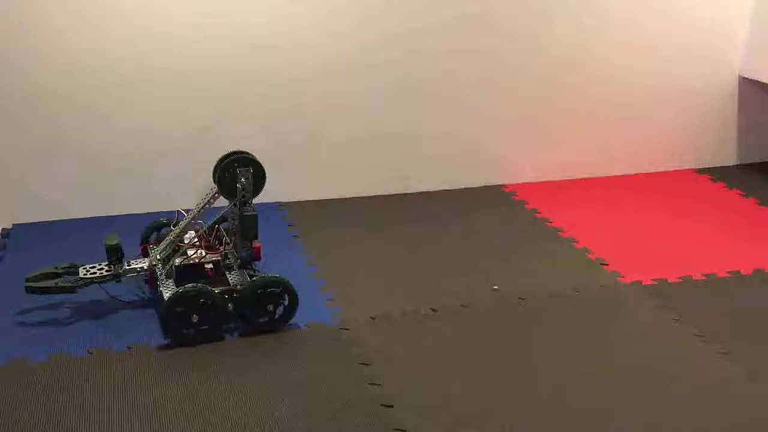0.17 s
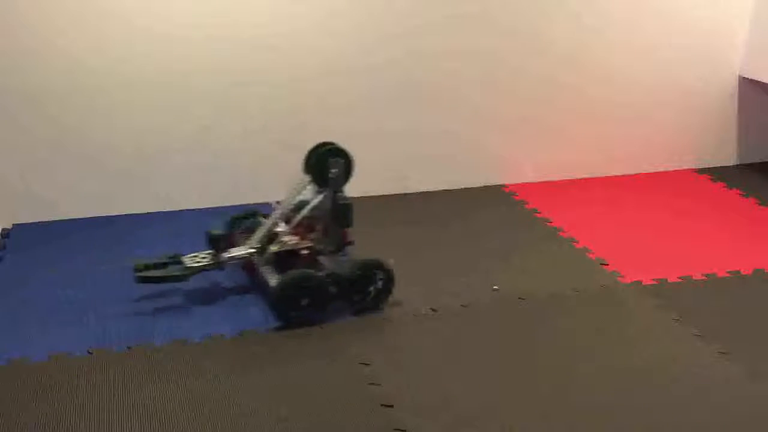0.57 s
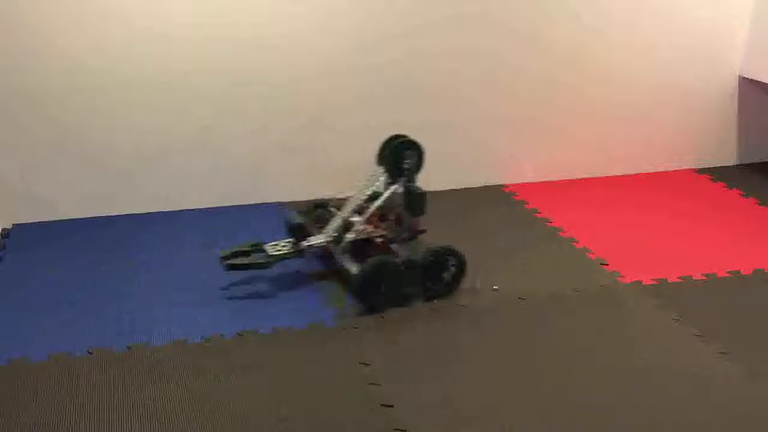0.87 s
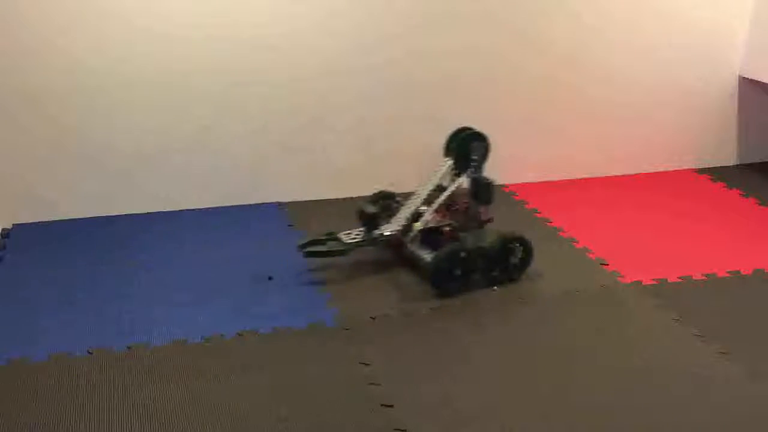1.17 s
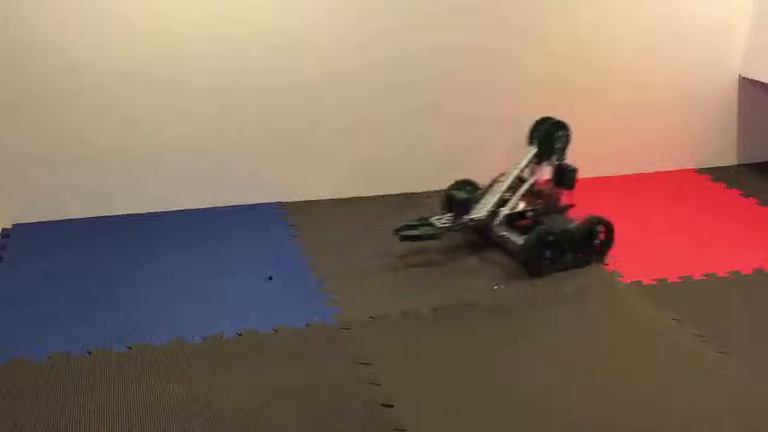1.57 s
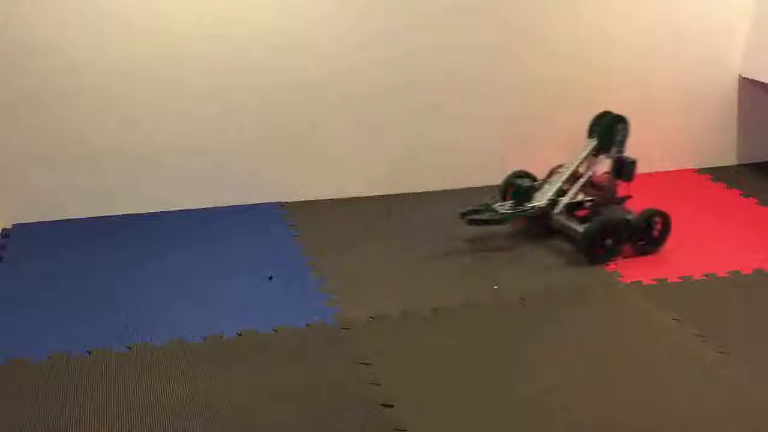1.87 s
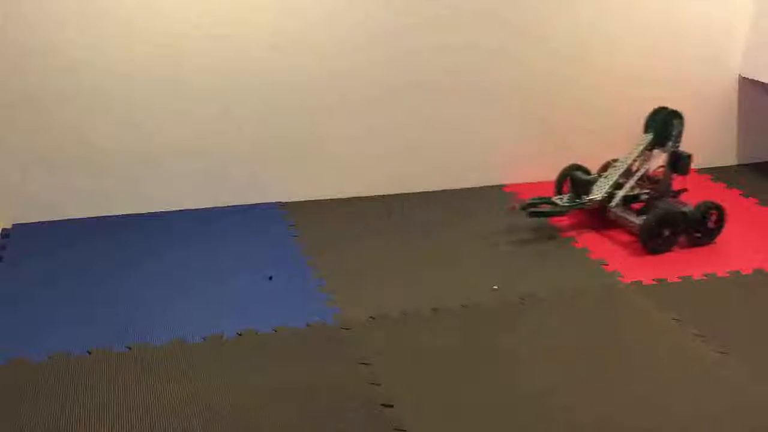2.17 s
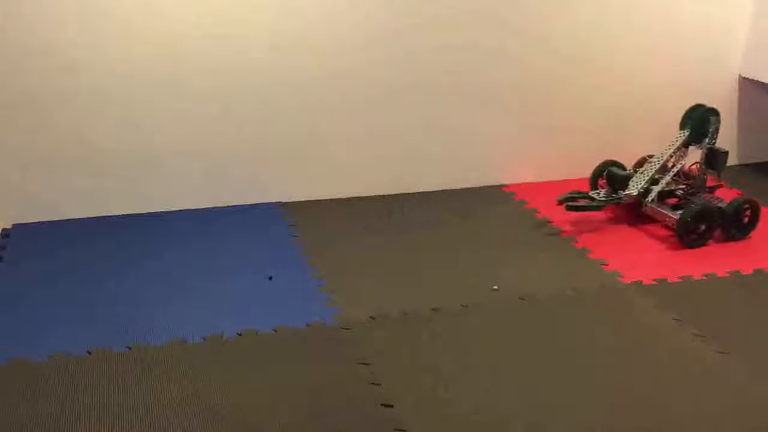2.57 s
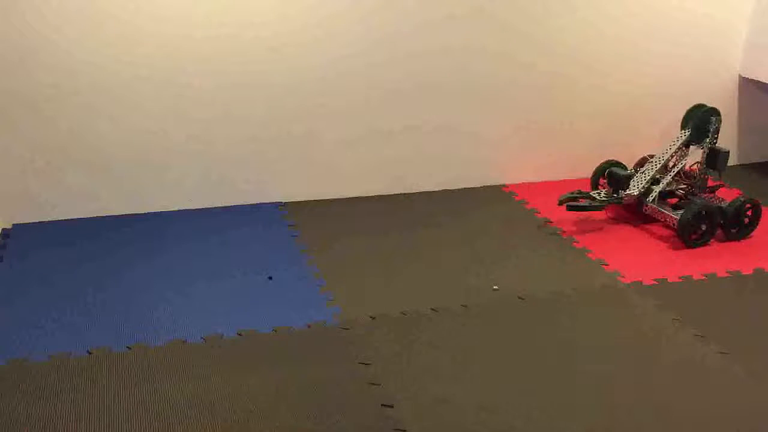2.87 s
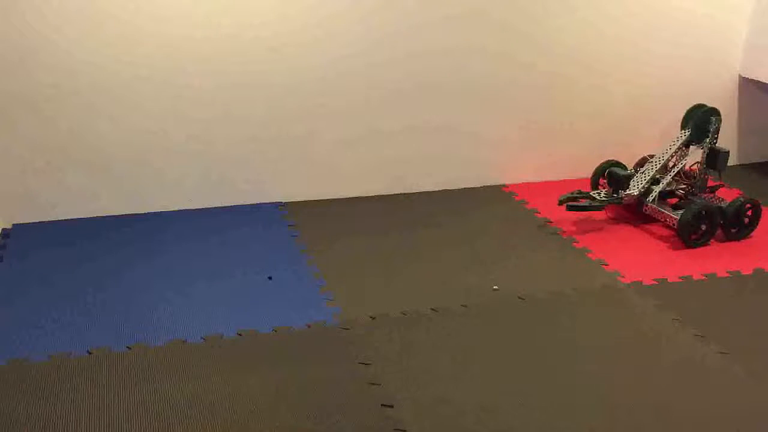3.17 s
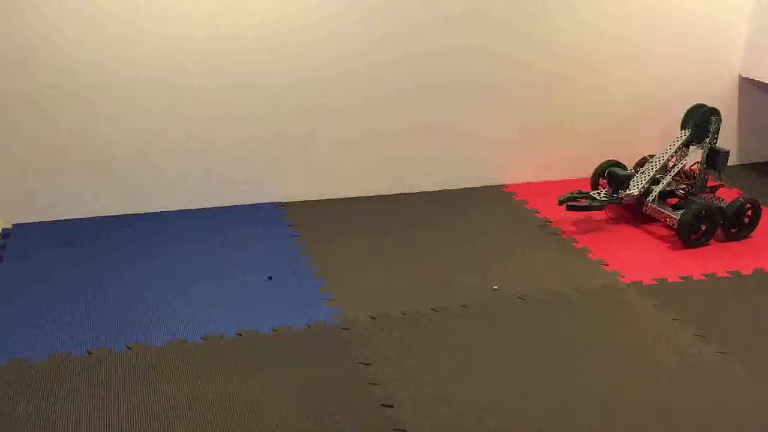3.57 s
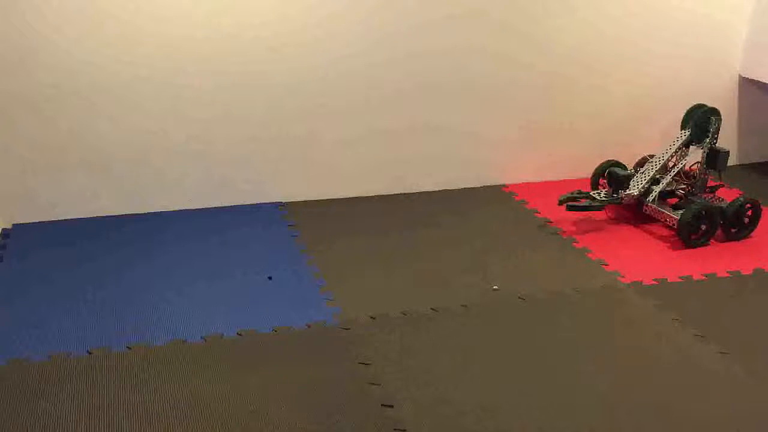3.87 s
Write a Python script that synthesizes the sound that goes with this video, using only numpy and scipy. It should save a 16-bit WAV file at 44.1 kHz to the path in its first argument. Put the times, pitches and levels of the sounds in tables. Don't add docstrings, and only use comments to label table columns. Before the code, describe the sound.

In a quiet room, a faint distant machine whine falls and fades just as a small robot starts with a rough motor groan. Gritty plastic gear rattle and wavering high whines run steadily over dull wheel rumble on foam, with small knocks and one sharp crack. It slows, grows duller and stops, leaving soft hiss. One microphone a few metres away.

```python
import sys
import numpy as np
from scipy import signal
from scipy.fft import rfft, irfft, next_fast_len
from scipy.io import wavfile
from scipy.ndimage import uniform_filter1d

SR = 44100
rng = np.random.default_rng(int(sys.argv[2]) if len(sys.argv) > 2 else 0)


def store_wav(level_fs):
    pcm = np.round(np.clip(np.atleast_2d(level_fs), -1, 1) * 32767)
    wavfile.write(sys.argv[1], SR, pcm.T.astype(np.int16))


def magnitude_from_level(level_db):
    exponent = np.asarray(level_db, float) / 20
    return 10 ** exponent


N = 177061
TIME = np.arange(N) / SR
START_S = .26


def noise():
    return rng.standard_normal(N)


def level(x, db):
    return x * magnitude_from_level(db) / np.sqrt(np.mean(x ** 2))


def curves(table, quiet_db=-130):
    s, *columns = np.transpose(table)
    gate_times = [s[0] - .004, s[0], s[-1], s[-1] + .03]
    gate_db = np.interp(TIME, gate_times, [quiet_db, 0, 0, quiet_db])
    return [np.interp(TIME, s, c) for c in columns] + [magnitude_from_level(gate_db)]


def colour(x, points):
    hz, db = np.transpose(points)
    size = next_fast_len(N)
    f = np.arange(size // 2 + 1) * SR / size + 1
    gain = magnitude_from_level(np.interp(np.log(f), np.log(hz), db))
    return irfft(rfft(x, size) * gain, size)[:N]


def ring(x, hz, width_hz):
    return signal.lfilter(*signal.iirpeak(hz, hz / width_hz, fs=SR), x)


def band(x, lo_hz, hi_hz):
    return signal.sosfilt(signal.butter(2, [lo_hz, hi_hz], "band", fs=SR, output="sos"), x)


def tilt(x, lo_hz, hi_hz, db):
    edges = [(.9 * lo_hz, -40), (lo_hz, 0), (hi_hz, 0), (1.1 * hi_hz, -40)]
    return colour(x, edges) * (magnitude_from_level(db) - 1)


def walk(rate):
    hold = max(int(SR / rate / 16), 1)
    coarse = np.repeat(rng.standard_normal(N // (16 * hold) + 2), hold)
    coarse = uniform_filter1d(uniform_filter1d(coarse, hold), hold)
    return 1.3 * np.interp(np.arange(N) / 16, np.arange(len(coarse)), coarse)


def tone(hz, wobble, rate):
    return 2 * np.pi * np.cumsum(hz * (1 + wobble * walk(rate))) / SR


def swell(s, length):
    return np.cos(np.pi / 2 * np.clip((TIME - s) / (length / 2), -1, 1))


# (frequency [Hz], density [dB per Hz])
HOUSE_SPECTRUM = [(30, -11.5), (60, 6.5), (85, 10.5), (125, 7.5), (150, 0.5), (175, 2.5), (240, -2),
                  (380, -5), (460, -9.5), (1000, -13.5), (2500, -14.5), (6500, -20.5), (11000, -24.5),
                  (14500, -26)]


def house():
    fade_db = -11 * np.maximum(TIME - 2.95, 0)
    low_db = -62.5 + fade_db - 6 * (TIME < START_S)
    low = magnitude_from_level(low_db + 3.0 + 1.5 * walk(8)) * np.sin(tone(58.5, 0.017, 8.7))
    high = magnitude_from_level(-66.5 + 2.0 + 2.2 * walk(16)) * np.sin(tone(107.5, .012, 11))
    hiss = colour(noise(), HOUSE_SPECTRUM)
    hiss *= magnitude_from_level(-72.5) / np.std(band(hiss, 130, 16000))
    return low + high + hiss * magnitude_from_level(0.68 * walk(3))


# (time [s], whine [Hz], level [dB])
RUN_DOWN = [(0.0, 376, -42), (0.042, 366, -44.5), (0.138, 360.5, -46), (0.228, 357, -53),
            (0.27, 356.4, -78)]
# (frequency [Hz], density [dB per Hz])
EARLY_HISS_SPECTRUM = [(600, -21), (1200, -4), (2500, -3), (4500, -1), (5600, 2.5), (6600, -3.5), (14500, -9),
                       (16000, -22)]


def far_machine():
    hz, db, gate = curves(RUN_DOWN)
    partner = magnitude_from_level(-15) * np.sin(tone(1.118 * hz, .003, 30))
    whine = magnitude_from_level(db + 3 + 1.0 * walk(33)) * (np.sin(tone(hz, 0.0019, 29)) + partner)
    early_hiss = level(colour(noise(), EARLY_HISS_SPECTRUM), -71)
    return gate * (whine + early_hiss)


# (start #
# [s], length [s], frequency [Hz], width [Hz], level [dB])
FAINT_SQUEAKS = [(0, .24, 500, 120, -70), (.063, .052, 1690, 30, -64), (.122, .082, 1670, 30, -64),
                 (.14, .05, 1520, 60, -73), (.23, .03, 2900, 200, -79), (.3, .06, 2050, 250, -42),
                 (2.28, .28, 1100, 200, -54), (2.58, .12, 2850, 400, -59), (2.58, .12, 1040, 120, -63),
                 (2.7, .1, 1040, 70, -69), (3.295, .04, 1780, 220, -71), (3.3, .03, 2700, 600, -81),
                 (3.6, .45, 200, 90, -78), (3.78, .18, 370, 12, -80), (3.84, .06, 2500, 2500, -80)]


def squeaks():
    out = np.zeros(N)
    for s, length, hz, width_hz, db in FAINT_SQUEAKS:
        shape = np.clip(np.minimum(TIME - s, s + length - TIME) / .012, 0, 1)
        if width_hz < 40:
            sound = np.sin(tone(hz, width_hz / hz / 2, 90)) * magnitude_from_level(2.5 * walk(130))
        else:
            sound = ring(ring(noise(), hz, width_hz), hz, 2 * width_hz)
        out += shape * level(sound, db)
    return out


# (time [s], rattle level [dB])
MOTOR_EFFORT = [(.259, -50), (.263, -36), (.317, -24), (.365, -29.5), (.54, -32.5), (.6, -29.5),
                (.93, -29.5), (1.0, -32.5), (1.06, -30), (2.1, -29.5), (2.35, -35.5), (2.41, -31.5),
                (2.49, -37), (2.53, -43.5), (2.62, -40), (2.73, -56), (2.77, -68), (2.86, -92)]
# (frequency [Hz], density [dB per Hz])
RATTLE_SPECTRUM = [(324, -28), (500, -25.5), (720, -21), (1050, -9.5), (1350, -10.5), (1850, -8),
                   (2430, -6), (2990, -3), (3400, -6.5), (4200, -5), (6070, -1.5), (8280, -1.5),
                   (14400, -3.5), (15600, -7)]
# (frequency [Hz], width [Hz], level [dB])
FRAME_MODES = [(1010, 310, -2.5), (1500, 60, -16.5), (2036, 120, -7.5), (4460, 220, -12.5), (5750, 720, -2),
               (6800, 300, -6), (8250, 680, -1), (9640, 300, -8), (11900, 330, -14.5)]
# (frequency [Hz], level over the rattle [dB])
TOOTH_ORDERS = [(4500, -28), (5150, -22), (5750, -20), (6700, -21), (8150, -17.5), (9700, -18.5),
                (12200, -22)]


def gears():
    rattle_db, gate = curves(MOTOR_EFFORT)
    strength_db = 1.1 * np.minimum(rng.exponential(size=N), 4)
    blows = noise() * magnitude_from_level(strength_db) * (rng.random(N) < .35)
    blows = level(blows * magnitude_from_level(0.96 * walk(14) + 0.61 * walk(250)), 0)
    modes = np.zeros(N)
    for hz, width_hz, db in FRAME_MODES:
        modes += magnitude_from_level(db + 3.1 * walk(12) + 2.0 * walk(2.5)) * ring(blows, hz, width_hz)
    body = colour(blows + 0.91 * modes, RATTLE_SPECTRUM)
    body /= np.std(band(body, 4000, 11000))

    drift = .012 * walk(3)
    for hz, db in TOOTH_ORDERS:
        body += magnitude_from_level(db + 3.8 * walk(18)) * np.sin(tone(hz * (1 + drift), .012, 40))

    coast_db = np.clip(-31 - rattle_db, 0, 27) * (TIME > 1)
    launch = np.exp(-np.abs(TIME - START_S) / .4)
    # (low [Hz], high [Hz], change per dB of coasting, change at launch [dB])
    bands = (350, 2100, 0.27, 2.5), (2300, 4400, .25, 5), (11500, 17000, -0.25, -0.5)
    body += sum(tilt(body, lo, hi, k * coast_db + db * launch) for lo, hi, k, db in bands)
    return body * magnitude_from_level(rattle_db) * gate


# (frequency [Hz], density [dB per Hz])
MAT_SPECTRUM = [(25, -27.5), (40, -6), (54, 4.5), (70, -2.5), (97, 3), (130, -7), (200, -5.5), (260, -14),
                (295, -30), (500, -50)]
# (centre [s], length [s], frequency [Hz], level [dB])
RIDGE_HUMS = [(.35, .12, 90, -43.5), (0.462, .08, 106.5, -47), (.52, .08, 84.2, -44),
              (0.882, .13, 93.1, -42.5), (1.1, 0.2, 102.1, -48.5), (1.472, 0.27, 102.5, -46),
              (1.57, .1, 69.9, -42), (1.693, 0.091, 96, -47), (2.084, 0.21, 97, -43),
              (2.36, .36, 101.3, -41), (1.43, 0.14, 152, -48), (1.57, 0.22, 152.3, -48),
              (1.752, .08, 150, -52), (1.952, 0.28, 147.2, -59.5)]


def wheels():
    upper_from_s, roll_end_s = .42, 2.45
    spin_up = (TIME - START_S) / 0.07
    run_out = (roll_end_s - TIME) / 0.17 + 1
    rolling = np.clip(np.minimum(spin_up, run_out), 0, 1)
    lurch_db = 6 * swell(upper_from_s + .1, .3)
    at_speed = (TIME > upper_from_s) & (TIME < roll_end_s)
    upper_db = np.where(at_speed, -9 + .6 * lurch_db, -24) + 2.6 * walk(9)
    rumble = level(colour(noise(), MAT_SPECTRUM), -1.3)
    rumble += tilt(rumble, 160, 300, upper_db + 6.0)
    rumble *= magnitude_from_level(-49 + .4 * lurch_db + 2.2 * walk(16))
    hums = sum(magnitude_from_level(db) * swell(s, length) * np.sin(tone(hz, .01, 24)) for s, length, hz, db in RIDGE_HUMS)
    return rolling * rumble + hums


# (time [s], pitch [Hz], level [dB], fundamental relative to it [dB])
MOTOR_STRAIN = [(.295, 1150, -51.5, -18.5), (.312, 1060, -45.5, -21), (.325, 960, -40.5, -12.5),
                (.345, 935, -35, 4.5), (.36, 937, -44, 0), (.385, 916, -43, -0.5), (.41, 920, -58.5, 4)]
# (multiple of the pitch, level [dB])
STRAIN_HARMONICS = [(2, 3), (3, -4), (4, -1), (6, -2), (9, -1)]


def strain():
    hz, db, first_db, gate = curves(MOTOR_STRAIN)
    phase = tone(hz, .008, 150)
    upper = sum(magnitude_from_level(d + 3 * walk(70)) * np.sin(k * phase) for k, d in STRAIN_HARMONICS)
    return magnitude_from_level(db) * gate * (magnitude_from_level(first_db) * np.sin(phase) + upper)


# (time [s], mesh frequency [Hz])
MESH_SPEED_A = [(.395, 2555), (.415, 2690), (.445, 2750), (.48, 2850), (.65, 2830), (.71, 2970),
                (1.02, 3063), (1.2, 2990), (1.66, 3086), (2.13, 3052), (2.31, 3105)]
MESH_SPEED_B = [(.45, 2643), (1.18, 2714), (1.4, 2640), (1.55, 2807), (1.76, 2830), (1.84, 2980),
                (2.02, 2913), (2.1, 2787), (2.4, 2797)]
# (centre [s], length [s], level [dB])
TOOTH_BITES_A = [(0.43, 0.13, -32.5), (.51, 0.075, -37), (0.623, 0.14, -36.5), (.76, .18, -36.5),
                 (.9, 0.11, -44.5), (1.029, 0.098, -39.5), (1.15, .1, -45), (1.4, .22, -50.5),
                 (1.53, .07, -45), (1.67, 0.1, -38.5), (2.12, .08, -46), (2.243, 0.13, -43)]
TOOTH_BITES_B = [(1.18, .12, -44), (1.38, .18, -44), (1.56, .18, -44), (1.84, 0.068, -31),
                 (1.94, 0.056, -41), (2.02, 0.095, -38.5)]


def mesh(speed, db, bites):
    hz, gate = curves(speed)
    phase = tone(hz, .0065, 70)
    beat_db = -3 + 2.0 * walk(45)
    load = magnitude_from_level(db) + sum(magnitude_from_level(bite_db) * swell(s, length) for s, length, bite_db in bites)
    return load * magnitude_from_level(beat_db) * gate * (np.sin(phase) + 0.38 * np.sin(2 * phase))


# (time [s], peak [dB], low [Hz], high [Hz], decay time T60 [s])
CHASSIS_KNOCKS = [
    (.43, -55, 597, 900, .05),
    (.452, -42, 447, 940, .06),
    (.578, -38.5, 393, 750, 0.056),
    (0.599, -44.5, 404, 590, 0.055),
    (.953, -37, 270, 950, 0.048),
    (1.894, -54, 450, 800, 0.055),
    (2.47, -55, 418, 640, .06),
]


def knocks():
    out = np.zeros(N)
    t = TIME[:4096]
    for s, db, lo_hz, hi_hz, t60 in CHASSIS_KNOCKS:
        thud = band(rng.standard_normal(len(t)) * magnitude_from_level(-60 * t / t60), lo_hz, hi_hz)
        out[int(s * SR):][:len(t)] += magnitude_from_level(db) * thud / np.max(np.abs(thud))
    return out


# (time [s], peak [dB], frequency [Hz], decay time T60 [s])
SNAP_MODES = [
    (.9532, -9, 3400, .004),
    (.9532, -13, 4300, .004),
    (.9533, -12, 5300, .006),
    (.9535, -18, 7600, .01),
    (.9545, -16, 5600, .013),
    (.9547, -21, 3900, .012),
    (.9533, -23, 14300, .007),
]


def snap():
    out = np.zeros(N)
    t = TIME[:4096]
    for s, db, hz, t60 in SNAP_MODES:
        attack = np.minimum(t * hz * 1.5, 1)
        out[int(s * SR):][:len(t)] += magnitude_from_level(db - 60 * t / t60) * np.sin(2 * np.pi * hz * t) * attack
    return out


def room(x):
    t60 = 0.18
    t = TIME[:SR // 2]
    diffuse = rng.standard_normal(len(t)) * (t > .004)
    dull = signal.lfilter([.3], [1, -.7], diffuse)
    tail = dull * magnitude_from_level(-60 * t / t60) + (diffuse - dull) * magnitude_from_level(-60 * t / (0.42 * t60))
    tail /= np.sqrt(np.sum(tail ** 2))
    return x + magnitude_from_level(-9.5) * signal.fftconvolve(x, tail)[:N]


def scene():
    robot = gears() + strain() + knocks() + snap()
    robot += mesh(MESH_SPEED_A, -48, TOOTH_BITES_A) + mesh(MESH_SPEED_B, -51.5, TOOTH_BITES_B)
    mono = house() + far_machine() + squeaks() + wheels() + room(robot) * magnitude_from_level(-1.0)
    return np.array([mono, mono])


def low_pass(x):
    return signal.sosfilt(signal.butter(12, 16670, fs=SR, output="sos"), x)


# (centre [s], low [Hz], high [Hz], level [dB])
SIDE_BANDS = [(.478, 13100, 14500, -50), (1.524, 8250, 9700, -41), (1.525, 12500, 13800, -43),
              (1.615, 5750, 6850, -41), (1.711, 4660, 5760, -49), (1.711, 6300, 7600, -44),
              (2.174, 10420, 12370, -44)]


def record(dry):
    side = np.zeros(N)
    for s, lo_hz, hi_hz, db in SIDE_BANDS:
        edges = [(.99 * lo_hz, -90), (lo_hz, 0), (hi_hz, 0), (1.01 * hi_hz, -90)]
        side += swell(s, .04) * level(colour(noise(), edges), db + 2.5)
    top_hz = 15650
    cut = np.array([colour(x, [(top_hz, 0), (top_hz + 60, -90)]) for x in dry])
    return low_pass(cut + np.array([side, -side]))


dry = scene()
out = record(dry)
store_wav(out)
```